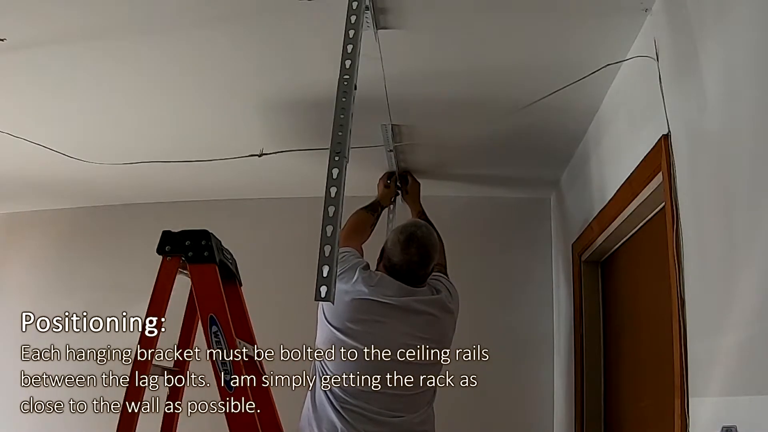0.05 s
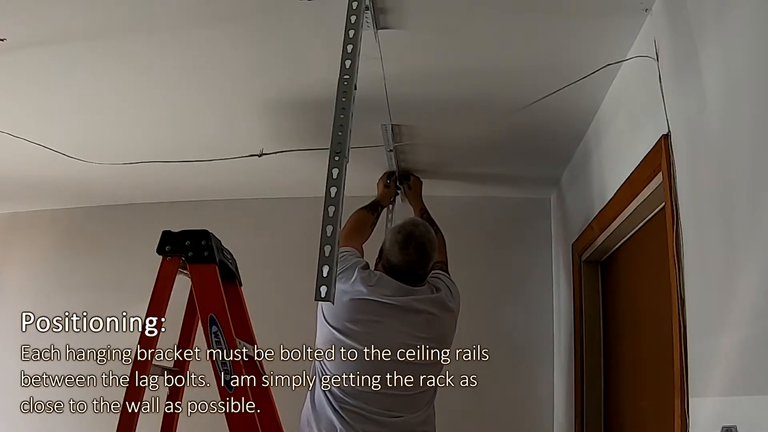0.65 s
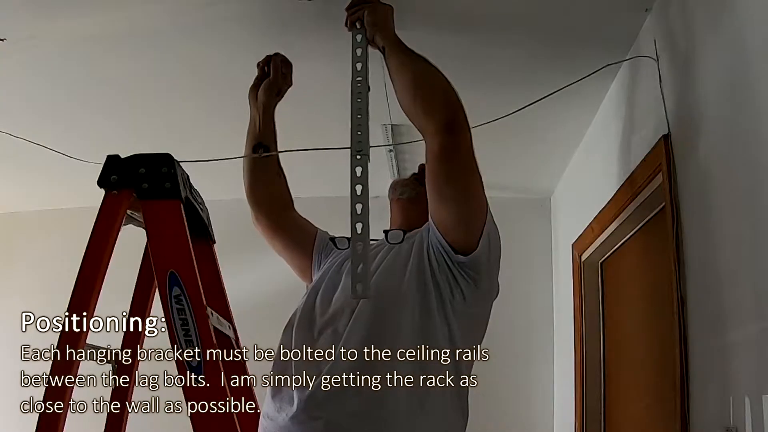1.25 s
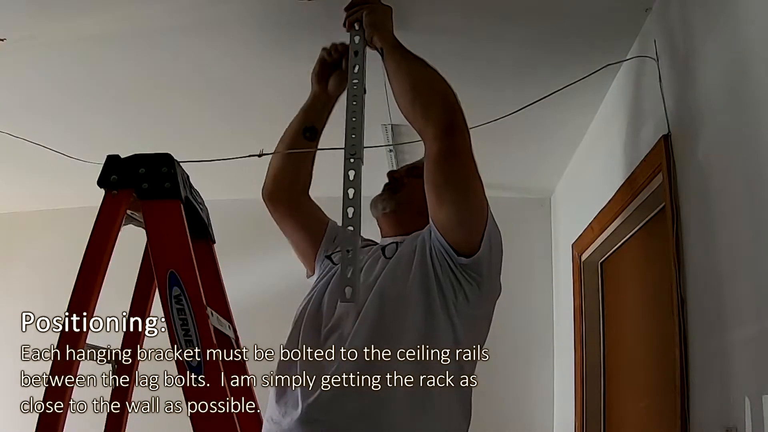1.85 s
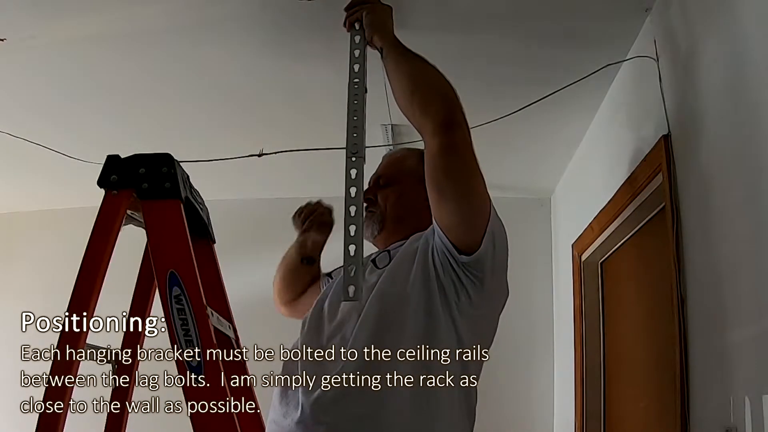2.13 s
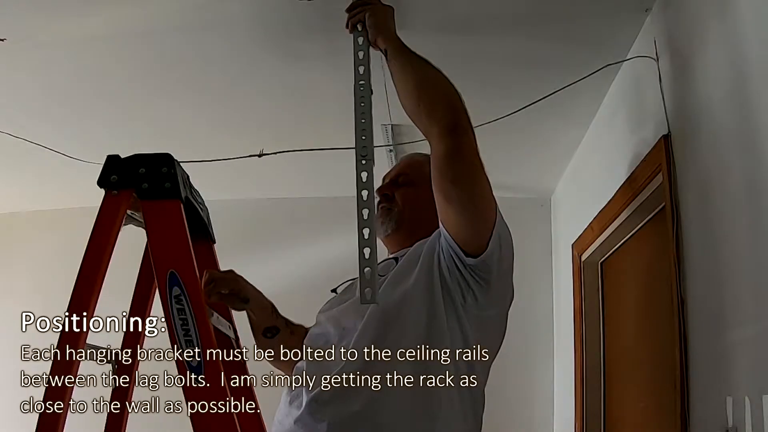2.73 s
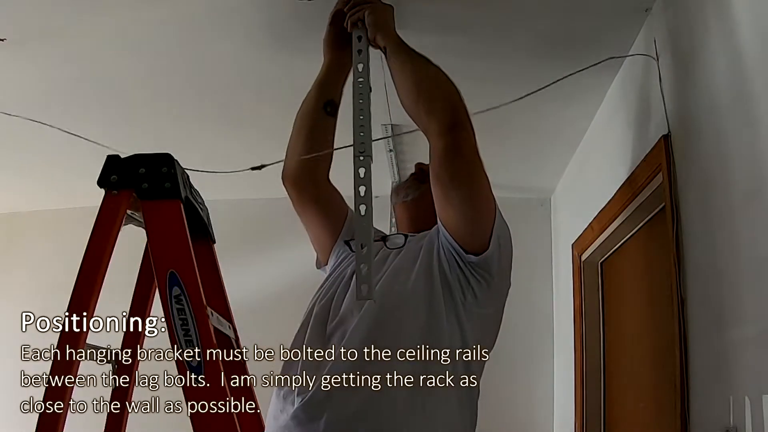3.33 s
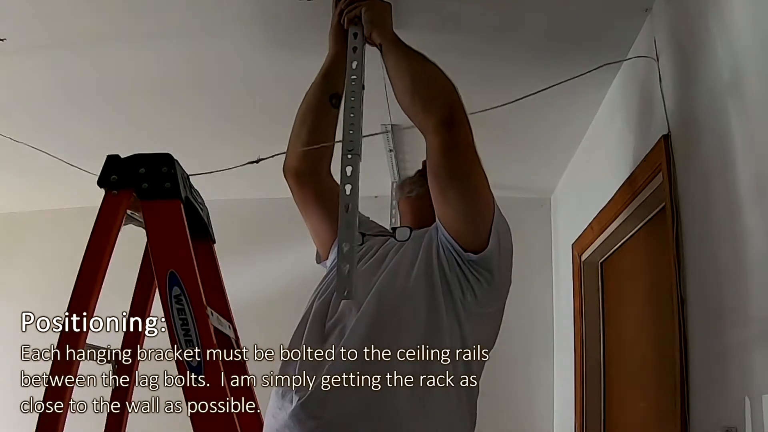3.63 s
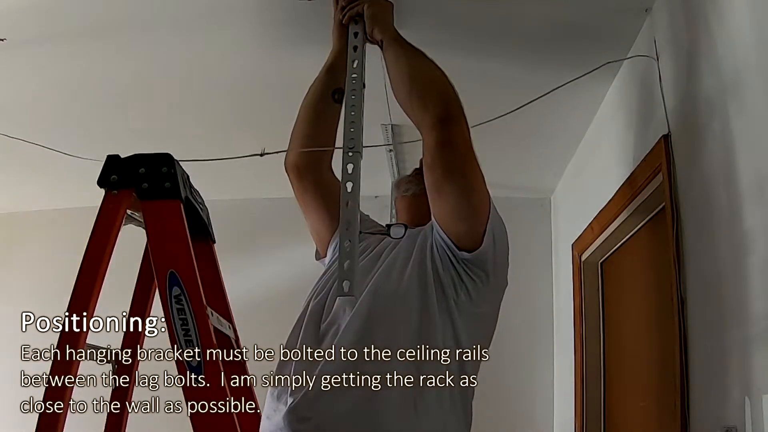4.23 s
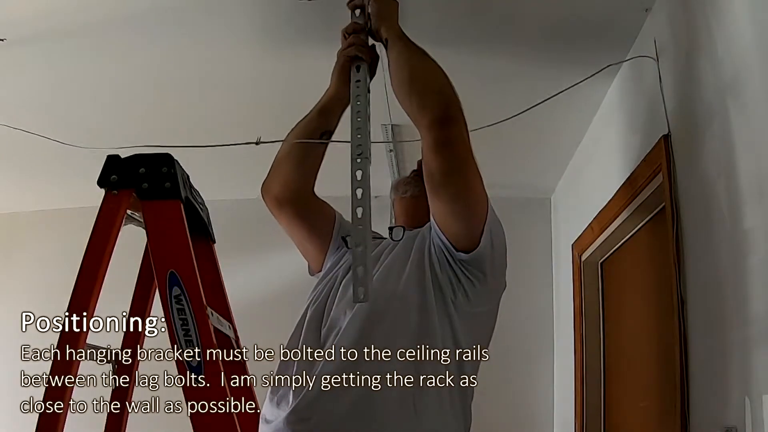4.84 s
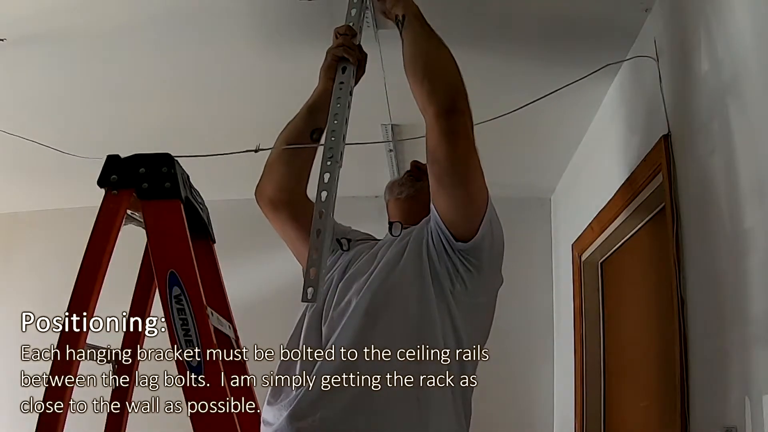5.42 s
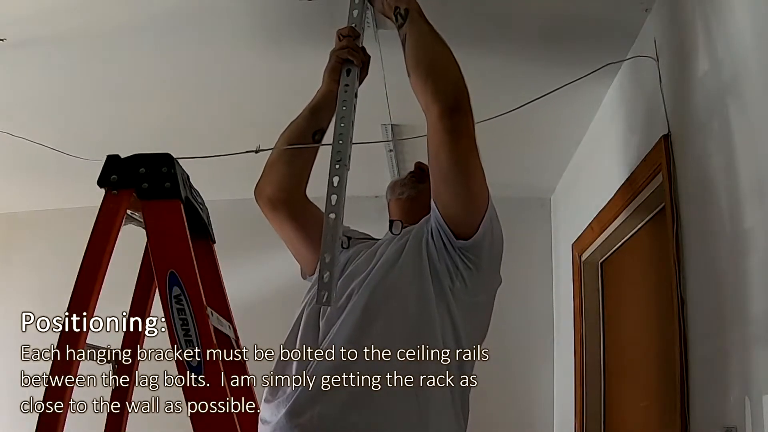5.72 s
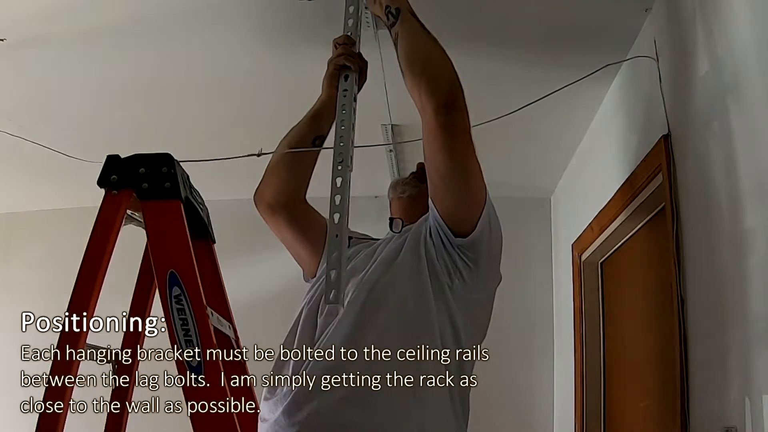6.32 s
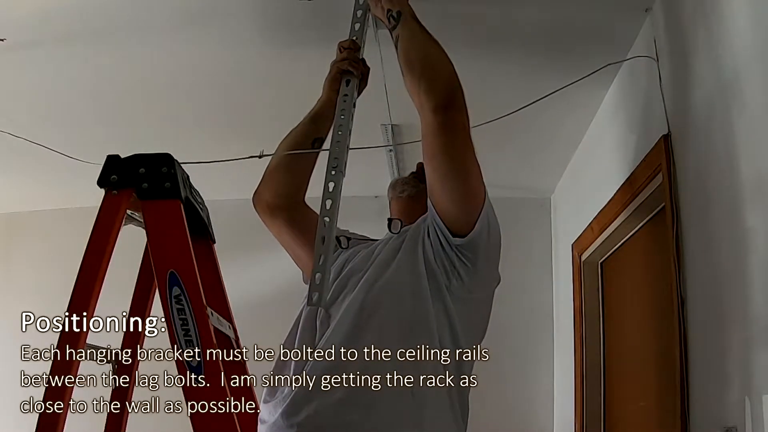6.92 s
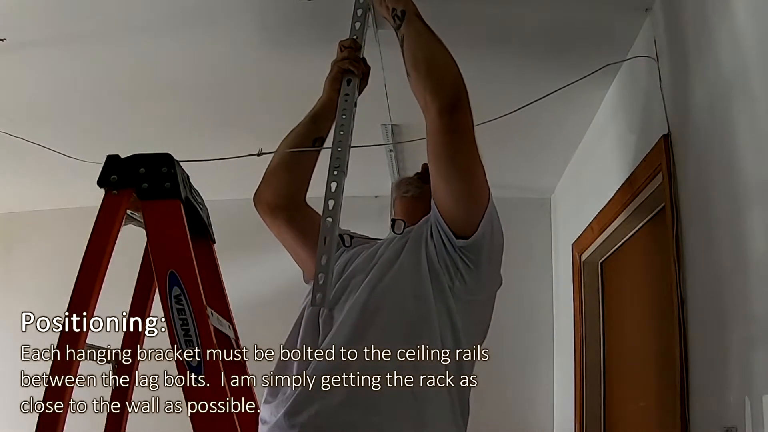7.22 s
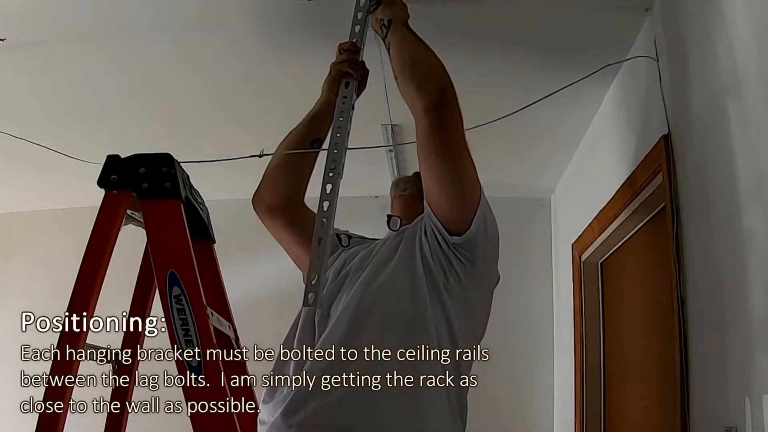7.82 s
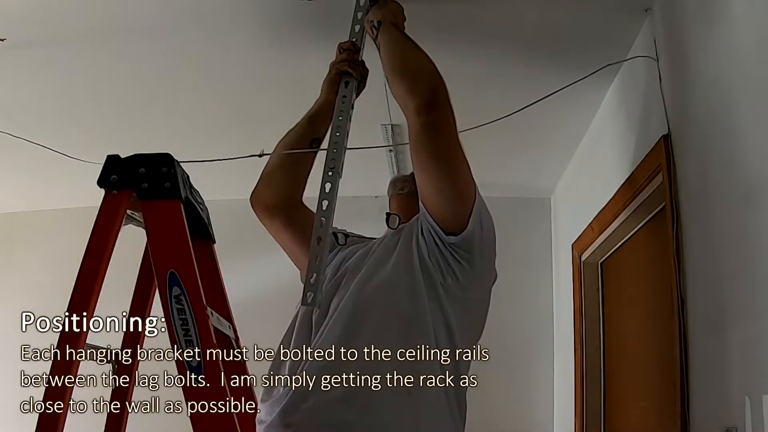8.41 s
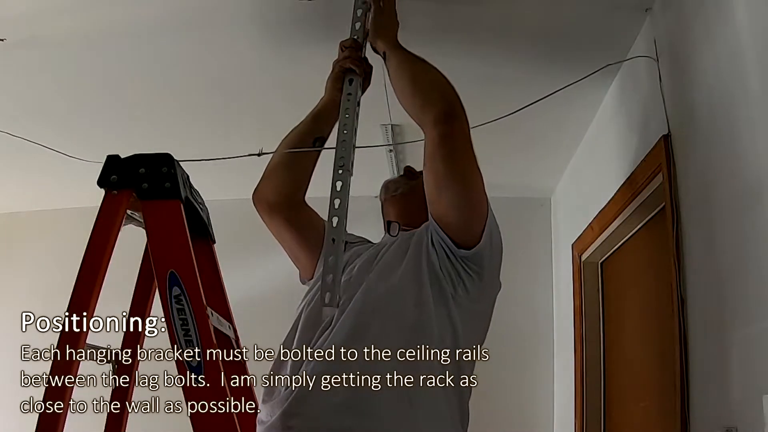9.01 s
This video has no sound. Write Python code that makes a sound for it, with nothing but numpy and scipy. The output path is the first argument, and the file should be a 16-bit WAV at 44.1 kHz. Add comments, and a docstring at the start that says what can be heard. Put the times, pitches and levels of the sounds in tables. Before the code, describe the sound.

A steel bracket is worked along a ceiling rail in a small, hard-walled garage, heard from a few metres away and slightly brighter on the right. From the start, steel clicks, chatters and scrapes lightly on steel, with a sharper clink at 0.8 seconds and soft bumps from the ceiling panel. At 2.5 seconds a steel tool clatters onto a stepladder in three quick, bright, loud hits. At about 3.3 seconds the bracket clanks and rings briefly. From 4 seconds, irregular clusters of clicks and short scrapes resume. The heaviest dull ceiling thud comes at 5.1 seconds, and a lesser one at 6.5. The metal ticks and rattles continue, bunching around 6 and 7.2 seconds, with sharp snaps near 8.1 and 8.8 seconds, until the work stops at about 9 seconds. A faint low floor rumble and quiet room air lie underneath throughout.

```python
"""A perforated steel bracket is worked along a ceiling rail in a small, hard-walled garage.
From the start steel clicks, chatters and scrapes on steel, and the ceiling panel thuds under the pushes.
At 2.5 s a steel tool clatters on the stepladder; just after 3.2 s the grip loosens and the bracket rings.
The heaviest thud comes at 5.1 s, and the work goes on until 9 s over a low rumble of the floor.
All is heard from a camera a few metres away, whose right microphone port is the brighter one."""
import sys
import numpy as np
from scipy import signal
from scipy.fft import rfft, irfft, next_fast_len
from scipy.io import wavfile
from scipy.ndimage import map_coordinates

SR = 44100
rng = np.random.default_rng(int(sys.argv[2]) if len(sys.argv) > 2 else 0)


def transcribe(u):
    """Save the signal u as a 16-bit wav file named by the first command-line argument.

    u: samples, shape (n,) or (channels, n), limited to [-1, 1]; the rate is SR.
    q: integer samples, one column per channel.
    """
    v = np.clip(np.atleast_2d(u).T, -1, 1)
    q = np.round(v * 32767).astype(np.int16)
    wavfile.write(sys.argv[1], SR, q)


N = 399546

# Levels are relative within a table. Knock (to 750 Hz), edge (4-6 kHz) and sparkle (from 7.8 kHz)
# tint a contact against its middle band.
# bracket and bolt on the rail: start_s, level_db, knock_db, sparkle_db, chatter_s, clink_hz
RAIL_CONTACTS = [(0.215, -46.5, -12, -15, 0.067, 2080), (0.243, -49.5, -10, -11, 0.024, 3000),
                 (0.326, -48.5, -26, -11, 0.023, 2400), (0.343, -44.5, -16, 1, 0.048, 1900),
                 (0.428, -40.5, -8, 3, 0.041, 2500), (0.829, -31, -11, 3.5, 0.019, 2170),
                 (0.834, -37.5, -14, 4.5, 0.033, 3350), (1.104, -49, -3.5, -10.5, 0.022, 1250),
                 (1.182, -73.5, -8, 25, 0.044, 8700), (1.302, -57.5, 2, 0.5, 0.052, 1260),
                 (1.53, -41.5, 0.5, -14.5, 0.062, 1730), (1.727, -43, 4.5, -31, 0.022, 1640),
                 (1.786, -37, -3, -10, 0.043, 1480), (1.826, -46, 7.5, -9, 0.05, 1440),
                 (1.918, -41.5, 8, -12, 0.021, 1470), (2.057, -44, -1, -4, 0.033, 1770),
                 (2.136, -37.5, 2, -17, 0.022, 1720), (2.969, -40, 5, -6, 0.056, 1510),
                 (3.148, -46, -11, 2.5, 0.12, 1140), (3.282, -25.5, -24, -14, 0.026, 3450),
                 (3.289, -29.5, -7, -12, 0.015, 3520), (3.3, -30, -2, -18, 0.015, 3430),
                 (3.317, -35, 2.5, -7.5, 0.024, 1600), (3.354, -40, 2, -8, 0.025, 1410),
                 (3.378, -46, 1, -10, 0.085, 1590), (3.609, -36, -1.5, -7, 0.042, 1354),
                 (3.92, -43.5, 1, -3, 0.02, 2683), (3.978, -44, 2, -14, 0.013, 1200),
                 (4.018, -29.5, -9, -8.5, 0.0069, 2280), (4.026, -30, -17, -5.5, 0.0043, 2980),
                 (4.044, -37.5, -16, 4, 0.0057, 5100), (4.049, -35, -7.5, -5, 0.011, 2400),
                 (4.395, -38, -4.5, -26, 0.05, 2760), (4.439, -37.5, -18, 1.5, 0.0045, 9100),
                 (4.444, -32.5, -33, -18, 0.011, 2540), (4.483, -34, -4.5, -22, 0.006, 3500),
                 (4.492, -39, -9, -20, 0.013, 2000), (4.551, -42, 6.5, -6, 0.021, 1900),
                 (4.572, -54, -11, 16.5, 0.02, 8100), (4.903, -41.5, 8.5, -11.5, 0.015, 2100),
                 (4.948, -41.5, 6, -11, 0.024, 1850), (5.003, -41.5, -38, -7.5, 0.0082, 2420),
                 (5.075, -34, -10.5, -3.5, 0.017, 1900), (5.094, -30, -5, -33, 0.013, 1730),
                 (5.168, -38, 5, -10, 0.0082, 1970), (5.354, -35, -2.5, -14, 0.0074, 8500),
                 (5.438, -42.5, -4.5, -13, 0.0055, 2300), (5.556, -45, 1.5, -13, 0.038, 2650),
                 (5.657, -30, -11, -25, 0.045, 2700), (5.66, -35, -8, 1.5, 0.0052, 8600),
                 (5.947, -41, 0, -13, 0.0026, 4060), (5.977, -40, -7, -8, 0.0034, 3050),
                 (5.998, -42.5, 2.5, -3.5, 0.0038, 3270), (6.013, -36.5, -21, -7, 0.0041, 3460),
                 (6.022, -35, -12, -3.5, 0.003, 2860), (6.03, -35.5, -2.5, -17, 0.0036, 2450),
                 (6.042, -36, -13, -29, 0.016, 2190), (6.054, -42, -2, -24, 0.023, 1820),
                 (6.133, -43.5, -3, -25, 0.022, 1860), (6.152, -42.5, 6, -14, 0.0038, 5250),
                 (6.406, -47.5, -5, -22, 0.017, 1600), (6.511, -44.5, 11, -1, 0.041, 3030),
                 (6.551, -36, -9, -26, 0.008, 2880), (6.581, -37, -1.5, 0.5, 0.0035, 9100),
                 (6.655, -37.5, 4, -15, 0.0042, 2680), (6.771, -42, -6, -56, 0.011, 3120),
                 (6.895, -43.5, -8.5, -31, 0.0055, 910), (7.048, -49.5, -2, -13, 0.051, 1710),
                 (7.081, -29.5, -11.5, -26, 0.005, 1720), (7.199, -35, -17, -20, 0.014, 1200),
                 (7.205, -30.5, -3, -17, 0.015, 1350), (7.259, -32, -4, 8, 0.0053, 6050),
                 (7.265, -31, -6, -12, 0.019, 1780), (7.296, -33.5, -4, -8, 0.014, 1790),
                 (7.305, -33, -3, -14, 0.024, 2860), (7.52, -39, -10, -11, 0.055, 1180),
                 (7.71, -46.5, 1.5, -16.5, 0.028, 1740), (7.883, -31, -5, -14, 0.0038, 2700),
                 (7.888, -31.5, -3, -31, 0.004, 2000), (8.005, -45.5, 6, -28, 0.014, 2520),
                 (8.025, -41.5, 3.5, -22, 0.012, 2960), (8.111, -43.5, -4, -12, .02, 2500),
                 (8.125, -37.5, -2, -9.5, 0.0045, 5170), (8.146, -24.5, -18, -6, 0.0023, 5030),
                 (8.15, -43, -3, -5, 0.0046, 3040), (8.164, -35, 0, -0.5, 0.061, 2760),
                 (8.295, -51, 5, 8.5, 0.074, 1360), (8.41, -43, 1, -15, 0.061, 1410),
                 (8.452, -36.5, -8, -9, 0.1, 1280), (8.506, -36.5, 0.5, -11, 0.024, 2840),
                 (8.636, -45.5, 2, -4.5, 0.025, 1390), (8.668, -40.5, -13, -6.5, 0.006, 5100),
                 (8.746, -38, -4, -13, 0.032, 2760), (8.804, -38.5, -13, -3.5, 0.0044, 8500),
                 (8.8474, -29.5, -20, 7, 0.0018, 8500), (8.848, -27, 4.5, -17, 0.003, 2860),
                 (8.906, -32.5, -10, -25.5, 0.0059, 1220), (9.022, -30.5, -11, -26, 0.012, 2980)]
# pushes along the rail: start_s, length_s, rub_db, hiss_over_rub_db
PUSHES = [(0.0, 0.12, -52.5, -14), (0.284, 0.18, -78, -3), (0.5, 0.072, -55, -31),
          (0.777, 0.068, -46.5, -9), (0.984, 0.027, -67, -37), (1.344, 0.26, -59, -3.5),
          (1.555, 0.32, -52, -7), (1.8, 0.43, -49.5, -9.5), (2.245, 0.57, -52.5, -11),
          (2.997, 0.11, -47, 1), (3.146, 0.52, -49, -22), (3.942, 0.031, -35.5, -15),
          (4.16, 0.043, -52, -12), (4.37, 0.2, -50.5, -11), (4.55, 0.035, -55, 13.5),
          (4.704, 0.15, -50.5, -10), (4.837, 0.17, -48.5, -10), (5.586, 0.079, -44.5, -19),
          (5.698, 0.041, -62.5, 15), (5.805, 0.11, -52, -45), (6.61, 0.18, -56.5, -3),
          (7.099, 0.12, -44.5, -10), (7.379, 0.2, -45, 1), (7.786, 0.2, -60.5, -10),
          (8.185, 0.049, -40, -3), (8.294, 0.052, -47.5, -9), (8.426, 0.26, -54, 2), (8.75, 0.1, -46, -22),
          (8.839, 0.074, -32.5, -3.5)]
# small steel spots that sing: start_s, pitch_hz, width_hz, level_db, rise_s, t60_s
SINGING_SPOTS = [(1.183, 14430, 130, -25, 0.001, 0.16), (4.441, 2590, 200, -31, 0.0022, 0.055),
                 (4.483, 3410, 150, -37, 0.00074, 0.055), (7.081, 1750, 50, -34, 0.001, 0.16),
                 (7.29, 1736, 44.9, -31.5, 0.0072, 0.25), (7.405, 1240, 220, -38, 0.024, 0.23),
                 (8.1462, 5040, 450, -13, 0.0005, 0.012), (8.149, 5200, 150, -32, 0.001, 0.08),
                 (8.44, 1260, 200, -34, 0.028, 0.3), (8.8472, 8800, 350, -14, 0.00057, 0.0098),
                 (8.903, 1230, 200, -20.5, 0.0044, 0.043)]
# tool on the ladder: start_s, level_db, knock_db, edge_db, sparkle_db, chatter_s, clink_hz
LADDER_HITS = [(2.513, -24, -16, 0, -0.5, 0.006, 1440), (2.516, -23.5, -13.5, 2.5, 0.5, 0.004, 1400),
               (2.522, -29, -20.5, 4, 6, 0.004, 5100), (2.615, -26.5, -15, -6, 2.5, 0.01, 1300),
               (2.62, -29.5, -11, 5.5, 1, 0.005, 3470), (2.71, -35.5, -15, 2.5, 0, 0.01, 3700),
               (2.716, -30.5, -11, 2, 7.5, 0.004, 3700), (2.729, -23, -12, -1, 4.5, 0.009, 1300),
               (2.734, -35, -10.5, 4.5, 4, 0.007, 3300), (2.741, -28.5, -13, 3, 2.5, 0.012, 6660)]
# bumps on the ceiling: start_s, level_db, cutoff_hz, bending_wave_db
CEILING_BUMPS = [(0.09, -53.5, 300, -1), (0.833, -48.5, 276, -8), (0.992, -55, 112, -6),
                 (3.06, -56, 256.6, -13), (3.29, -53, 560, -17), (3.345, -45, 615, -17.5),
                 (3.612, -49.5, 282, -18), (4.03, -50.5, 106, -13), (4.712, -38.5, 300, 3.5),
                 (5.092, -22.5, 760, -6.5), (5.29, -44.5, 150, 5), (5.612, -42.5, 225, -0.5),
                 (6.015, -42, 90, -13), (6.51, -32.5, 192, 6), (7.068, -53.5, 169.3, -21),
                 (7.205, -48, 114, -5.5), (7.713, -43.5, 180, 5.5), (8.006, -42.5, 198, 1),
                 (8.146, -48.5, 214, -12), (8.635, -44, 170, 5), (8.745, -41.5, 188, -2)]
# weight shifting on the floor: time_s, rumble_db
FLOOR_SWAY = [(0.0, -54), (0.2, -56.5), (0.91, -61.5), (0.98, -58), (1.29, -62.5), (2.62, -52), (2.73, -65),
              (3.05, -56), (4.29, -62.5), (5.35, -50), (5.8, -63.5), (6.13, -50.5), (6.33, -60.5),
              (6.58, -47), (7.62, -63), (9.06, -50)]
# modes of the bracket, of tool and ladder, and of ceiling and room: pitch_hz, level_db, t60_s
BRACKET_MODES = [(614, -5, 0.19), (797, -8.5, 0.43), (1152, -18.5, 0.36), (1310, -8, 2.4), (1460, -4, 0.55),
                 (1640, -5, 0.55), (1700, 1, 0.55), (2160, -16.5, 0.28), (2370, -2.5, 0.33),
                 (2810, 0.5, 0.3), (3031, -16.5, 0.26), (3400, -10, 0.33), (3500, 2, 0.36),
                 (3940, -4.5, 0.3), (4160, -2, 0.34), (4780, -1, .28), (4930, -1.5, 0.26),
                 (6870, -6.5, 0.3)]
TOOL_MODES = [(374, -1, 0.8), (556, -16.5, .4), (797, -1.5, 0.45), (1330, -1.5, 0.3), (1490, -8, 0.17),
              (1746, -5.5, 0.38), (1943, -16.5, .25), (2358, -13.5, .24), (3120, -6.5, 0.36),
              (3640, -9.5, .3), (3740, -10.5, 0.17), (4860, -5, 0.24), (5190, 2, 0.27), (5480, -2, .23),
              (6660, 2.5, 0.22), (7235, -1, .25), (7540, -1, 0.25), (8620, -11.5, 0.2)]
CEILING_MODES = [(65.53, 1.5, 0.89), (113, -41, 0.58), (156.6, 0.5, 0.64), (210.7, 0.5, 0.46),
                 (250, 2, 0.18), (278, 3.5, 0.33), (474, -0.5, 0.32), (762, 5.5, 0.17)]
# spectra of steel impact, sliding rub and hiss, floor and room air: frequency_hz, density_db
IMPACT_SPECTRUM = [(60, -23), (150, -19.5), (300, -7.5), (520, -3), (800, 5.5), (1100, -1), (1550, 0.5),
                   (2600, -4), (3500, 0.5), (6000, -6), (9000, -7), (11000, -9), (15500, -5.5)]
RUB_SPECTRUM = [(100, -55), (300, 1), (550, -2.5), (800, 9), (1100, 1), (1500, 7), (2200, 1.5), (3300, -3),
                (5000, -9), (9000, -80)]
HISS_SPECTRUM = [(1000, -36.5), (3000, -6.5), (4500, -5), (6500, -5.5), (9000, -8), (11000, -6),
                 (15500, -10)]
FLOOR_SPECTRUM = [(15, 5), (30, 4), (45, 10.5), (64, 20.5), (90, -5), (160, 6.5), (300, -7), (600, -9),
                  (2000, -56)]
AIR_SPECTRUM = [(22, 13.5), (50, -8.5), (200, 9.5), (550, -10), (800, 9), (1100, -31.5), (1450, 14),
                (2500, -15.5), (5000, -8), (9000, -17.5), (15000, -39.5)]
# reverberation time of the garage: frequency_hz, t60_s
ROOM_DECAY = [(100, 0.63), (500, 0.24), (1400, 0.36), (3700, 0.29), (9000, 0.24), (15000, 0.087)]
# strength of the reflections: frequency_hz, room_over_direct_db
ROOM_LEVEL = [(200, 15.5), (1500, 5), (4000, 4), (8500, 1), (14000, 7.5)]
# left-right likeness of the diffuse field: frequency_hz, coherence_ratio
COHERENCE = [(500, 0.36), (1200, 0.45), (2500, 0.52), (5000, 0.25), (10000, 0.092)]
# responses of the microphone ports: frequency_hz, gain_db
LEFT_RESPONSE = [(100, -0.5), (1200, -5.5), (2500, -2), (4500, -6.5), (6800, -7), (8500, -12),
                 (11000, -29.5), (15000, -53)]
RIGHT_RESPONSE = [(100, 0.75), (1200, -4), (2500, -0.5), (4500, -2.5), (7000, 1), (8700, 6), (9500, 0.5),
                  (15000, -24)]

SIZE = 32768  # samples in one impulse response
T, HZ = np.arange(SIZE) / SR, np.fft.rfftfreq(SIZE, 1 / SR)


def bracket(rooms, contacts, gain_db=4, held_db=-21, free_db=-1.5, loose_s=(3.2, 3.5)):
    """Damping: impacts excite the bracket's modes, which ring freely only while the grip is loose."""
    out, modes = np.zeros((2, N)), resonances(BRACKET_MODES, split=0.011, count=6)
    for k, (start_s, db, knock_db, sparkle_db, chatter_s, clink_hz) in enumerate(contacts):
        ring_db = free_db if loose_s[0] < start_s < loose_s[1] else held_db
        body = 1 + amp(ring_db) * ring(modes)
        edge_db = 2.05 + 0.53 * sparkle_db
        spot_db = clink(clink_hz, 6.5 - 0.5 * np.log2(clink_hz / 2000))
        hit = impact(knock_db, edge_db, sparkle_db, chatter_s, body, rooms[k % len(rooms)], spot_db)
        add(out, start_s, amp(db + gain_db) * np.sqrt(SR / 10) * hit)
    return out


def catches(rate_per_s=8, knock_db=1, sparkle_db=-3, chatter_s=0.015, clink_hz=2180):
    """Stick-slip: a push snags up to four times at random, more loudly the harder it rubs."""
    contacts = []
    for start_s, length_s, rub_db, _ in PUSHES:
        delays = np.cumsum(rng.exponential(1 / rate_per_s, 4))
        levels, spots = rng.standard_normal((2, 4))
        for delay_s, db, hz in zip(delays, rub_db - 5 - 2.5 * levels, clink_hz * 2 ** (spots / 2)):
            if delay_s < length_s:
                contacts.append((start_s + delay_s, db, knock_db, sparkle_db, chatter_s, hz))
    return contacts


def push_speeds(rise_share=0.18, fall_s=0.039):
    """Stick and slide: each push gathers speed from 0 to 1, holds, and slows until the bracket sticks."""
    t = np.arange(N, dtype=np.float32) / SR
    speeds = []
    for start_s, length_s, _, _ in PUSHES:
        rise = np.clip((t - start_s) / (rise_share * length_s), 0, 1)
        fall = np.exp(-np.clip((t - start_s - length_s) / fall_s, 0, 20))
        speeds.append(rise * fall)
    return np.array(speeds)


def sliding(speeds, idle_rub_db=-63.5, idle_hiss_db=-74.5, catch_db=7.5, grain_db=0.5):
    """Sliding friction: plated steel catches and slips on fine grains, louder with speed."""
    _, _, rub_db, hiss_db = np.transpose(PUSHES)
    rub = amp(idle_rub_db) + amp(rub_db - 1) @ speeds
    hiss = amp(idle_hiss_db) + amp(rub_db + hiss_db - 2) @ speeds
    roughness = amp(catch_db * np.minimum(wobble(60), 1.5) + grain_db * np.minimum(wobble(500), 1.5))
    friction = rub * coloured(roughness * rng.standard_normal(N), RUB_SPECTRUM)
    friction += hiss * coloured(roughness * rng.standard_normal(N), HISS_SPECTRUM)
    room = irfft(garage())[:, :SIZE // 2]
    return signal.fftconvolve(friction[None], room, axes=1)[:, :N]


def pings(rooms):
    """Narrow resonance: small steel spots sound at once when flicked and swell when rubbed."""
    out = np.zeros((2, N))
    for k, (start_s, hz, width_hz, db, rise_s, t60_s) in enumerate(SINGING_SPOTS):
        tone = unit(irfft(rfft(rng.standard_normal(SIZE)) * bell(HZ - hz, width_hz)))
        swell = np.minimum(T / rise_s, 1) * amp(db - 60 * np.maximum(T - rise_s, 0) / t60_s)
        add(out, start_s, irfft(rfft(tone * swell) * rooms[k % len(rooms)]))
    return out


def tool(gain_db=5.5, ring_db=-7, settle_s=0.049, settle_db=-14, settle_chatter_s=0.054):
    """Rebound: the tool lands on the ladder end after end, and a weaker rattle follows each blow."""
    out, modes = np.zeros((2, N)), resonances(TOOL_MODES, split=0.011, count=7)
    for start_s, db, knock_db, edge_db, sparkle_db, chatter_s, clink_hz in LADDER_HITS:
        body = 1 + amp(ring_db) * ring(modes)
        room = garage(reflections_db=1.5)
        gain = amp(db + gain_db) * np.sqrt(SR / 10)
        blow = impact(knock_db, edge_db, sparkle_db, chatter_s, body, room, clink(clink_hz, 8.5))
        rattle = impact(knock_db, edge_db, sparkle_db, settle_chatter_s, body, room)
        add(out, start_s, gain * blow)
        add(out, start_s + settle_s, gain * amp(settle_db) * rattle)
    return out


def ceiling(rooms, wave_hz=159.5, wave_octaves=0.34, delay_s=0.052, modes_db=-12, echo_db=-3, low_hz=55):
    """Dispersion: the panel thuds at once; its bending wave follows, higher frequencies first."""
    out, modes = np.zeros((2, N)), resonances(CEILING_MODES)
    droop = np.exp(2j * np.pi * delay_s * wave_hz ** 2 / (HZ + 1))  # delay falls as frequency squared
    wave = amp(3) * droop * bell(np.log2((HZ + 1) / wave_hz), wave_octaves)
    for k, (start_s, db, cutoff_hz, wave_db) in enumerate(CEILING_BUMPS):
        band_db = -10 * np.log10((1 + (HZ / cutoff_hz) ** 5) * (1 + (low_hz / (HZ + 1)) ** 6))
        room = rooms[k % len(rooms)]
        bending = amp(wave_db) * wave * (1 + amp(echo_db) * room)
        body = room + bending + amp(modes_db) * ring(modes)
        thud = irfft(causal(band_db) * body)
        add(out, start_s, amp(db) * thud / np.std(thud[:, :SR // 10]))
    return out


def impact(knock_db, edge_db, sparkle_db, chatter_s, body, room, spot_db=0):
    """Source and filter: a contact force, tinted by its hardness, passes through body and room."""
    tint_db = along([(750, knock_db), (1300, 0.012), (2500, 0.0062),
                     (3800, edge_db), (5700, edge_db), (7800, sparkle_db)], HZ)
    colour = causal(tint_db + along(IMPACT_SPECTRUM, HZ) + spot_db)
    return irfft(contact_force(chatter_s) * colour * body * room)


def contact_force(chatter_s, touch_s=0.0024, rebounds_per_s=1500, grit=0.22, clump_db=6, seat_s=0.0004):
    """Chatter: the spectrum of a first touch and a dying swarm of tiny rebounds in clumps."""
    clumps = amp(clump_db * np.interp(T, T[::256], rng.standard_normal(SIZE // 256)))
    rebounds = rng.random(SIZE) < rebounds_per_s / SR
    swarm = (rebounds + grit) * clumps * np.exp(-2 * T / max(chatter_s, 1 / SR))
    touch = 1.4 * np.exp(-T / touch_s)
    bite = 1 - np.exp(-T / (seat_s + chatter_s / 10))  # a long scraping contact bites more slowly
    force = (swarm + touch) * bite * rng.uniform(-1, 1, SIZE)
    return rfft(force) / np.linalg.norm(force[:SR // 25])  # unit energy in the first 40 ms


def clink(hz, height_db, width_hz=410):
    """Local resonance: the touched edge or bolt adds a broad peak, in dB, to the spectrum."""
    return height_db * (bell(HZ - hz, width_hz) - 0.25)


def resonances(modes, split=0, count=1):
    """Normal modes: spectra of damped sines; thin steel splits each into close neighbours."""
    hz, db, t60_s = np.repeat(modes, count, axis=0).T[:, :, None]
    hz = hz * (1 + split * rng.standard_normal(hz.shape))
    gain = amp(db) / np.sqrt(count * t60_s * SR)  # energy is independent of decay time
    ringing = gain * amp(-60 * T / t60_s) * np.sin(2 * np.pi * hz * T)
    return rfft(ringing.astype(np.float32))


def ring(modes):
    """Superposition: each blow lands elsewhere and shares its energy anew among the modes."""
    shares = rng.uniform(0.5, 1.5, len(modes)) * rng.choice([-1, 1], len(modes))
    return shares.astype(modes.dtype) @ modes


def garage(reflections_db=0, build_s=0.00091):
    """Reverberation: the response of a direct path and a tail in which each band dies at its own rate."""
    hz, t, bands = signal.stft(rng.standard_normal((2, SIZE)), SR, nperseg=256)
    t60_s = along(ROOM_DECAY, hz)[:, None]
    bands = bands * amp(-60 * t / t60_s) / np.sqrt(t60_s * SR / np.log(10 ** 6))
    tail = signal.istft(bands, SR, nperseg=256)[1][:, :SIZE]
    reflections = diffuse(tail * (1 - np.exp(-T / build_s)))
    wet = amp(along(ROOM_LEVEL, HZ) + reflections_db)
    return (1 + wet * rfft(reflections)) / np.sqrt(1 + wet ** 2)


def background(waver_db=3, air_db=-65):
    """Structure-borne noise: the floor rumbles as weight shifts, beneath the room's faint steady air."""
    sway_db = np.interp(np.arange(N) / SR, *np.transpose(FLOOR_SWAY))
    sway = amp(sway_db + 0.5 + waver_db * wobble(11))
    rumble = coloured(diffuse(rng.standard_normal((2, N))), FLOOR_SPECTRUM)
    air = coloured(diffuse(rng.standard_normal((2, N))), AIR_SPECTRUM)
    return sway * rumble + amp(air_db) * air


def diffuse(pair, mono_hz=470):
    """Diffuse field: sound arrives from all around, and long waves reach both ports alike."""
    def mid_and_side(hz):
        width = 0.15 + 0.85 / (1 + (mono_hz / (hz + 1)) ** 6)
        angle = width * np.arccos(along(COHERENCE, hz)) / 2
        return np.array([np.cos(angle), np.sin(angle)])
    mid, side = filtered(pair, mid_and_side)
    return np.array([mid + side, mid - side])


def amp(db):
    """Decibels to gain."""
    return 10 ** (np.asarray(db) / 20)


def unit(x):
    """Normalisation to rms 1."""
    return x / np.sqrt(np.mean(x ** 2) + 1e-20)


def bell(offset, width):
    """Gaussian curve of height 1."""
    return np.exp(-0.5 * (offset / width) ** 2)


def along(points, hz):
    """Interpolation on a logarithmic frequency axis."""
    knots_hz, values = np.transpose(points)
    return np.interp(np.log(hz + 1), np.log(knots_hz + 1), values)


def wobble(knots_per_s):
    """Random modulation: straight lines between Gaussian values."""
    knots = rng.standard_normal(int(N * knots_per_s / SR) + 4)
    return map_coordinates(knots, [np.arange(N) * knots_per_s / SR], order=1)


def filtered(x, response):
    """Linear filtering: the spectrum times a function of frequency."""
    n = x.shape[-1]
    padded = next_fast_len(n + SIZE // 4)
    return irfft(rfft(x, padded) * response(np.fft.rfftfreq(padded, 1 / SR)), padded)[..., :n]


def coloured(x, spectrum):
    """Spectral shaping, scaled to rms 1."""
    return unit(filtered(x, lambda hz: amp(along(spectrum, hz))))


def causal(db):
    """Minimum phase: the promptest causal response with this gain."""
    cepstrum = irfft(db * np.log(10) / 20)
    cepstrum[1:SIZE // 2] *= 2
    cepstrum[SIZE // 2 + 1:] = 0
    return np.exp(rfft(cepstrum))


def add(track, start_s, sound, size=26000):
    """Mixing: the first size samples of a sound join the track, fading over their last tenth."""
    part = track[:, max(round(start_s * SR), 0):][:, :size]
    fade = np.minimum(np.linspace(10, 0, size), 1)
    part += (sound[:, :size] * fade)[:, :part.shape[1]]


def scene(spots=12):
    """Superposition: all sources add, sounding from slightly different spots in the garage."""
    rooms = [garage() for _ in range(spots)]
    return (tool() + ceiling(rooms) + sliding(push_speeds()) + background()
            + pings(rooms) + bracket(rooms, RAIL_CONTACTS + catches()))


def record(dry, limit_hz=15600):
    """Frequency response: each port colours the sound, and nothing passes above the band limit."""
    def ports(hz):
        return amp([along(LEFT_RESPONSE, hz), along(RIGHT_RESPONSE, hz)]) * (hz < limit_hz)
    return filtered(dry, ports)


dry = scene()
out = record(dry)
transcribe(out)
```